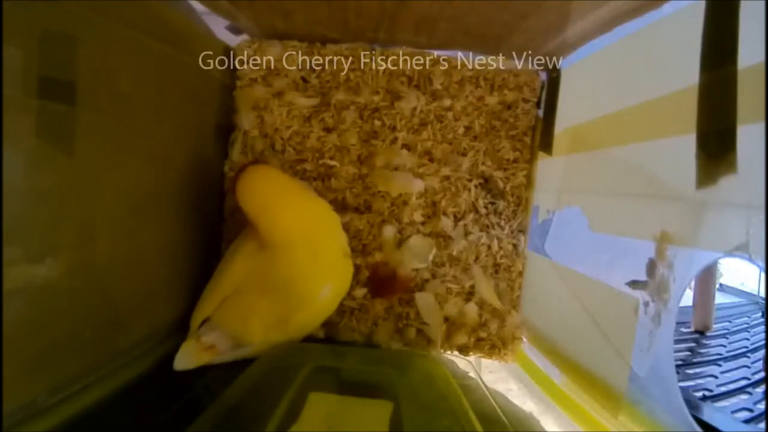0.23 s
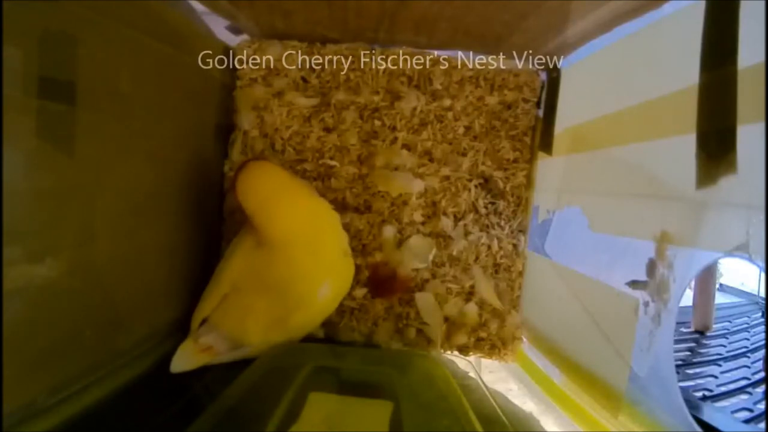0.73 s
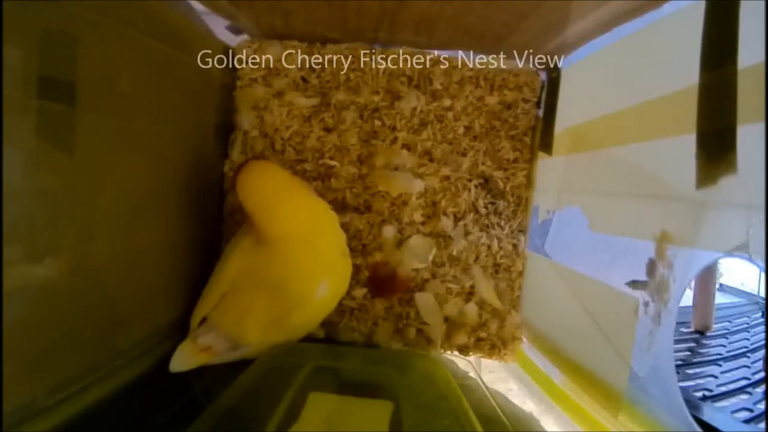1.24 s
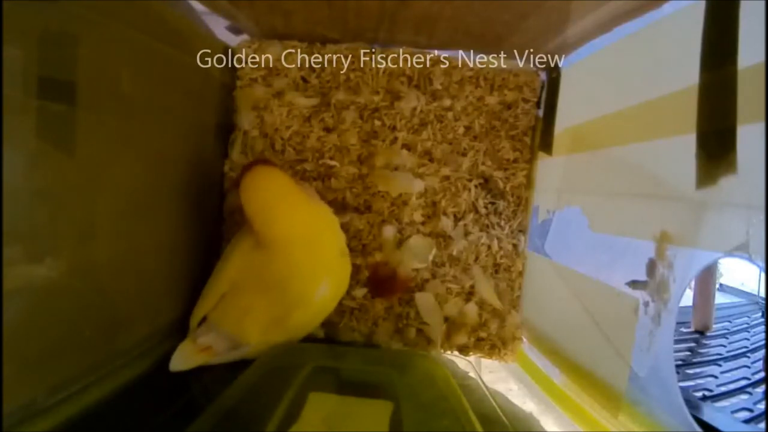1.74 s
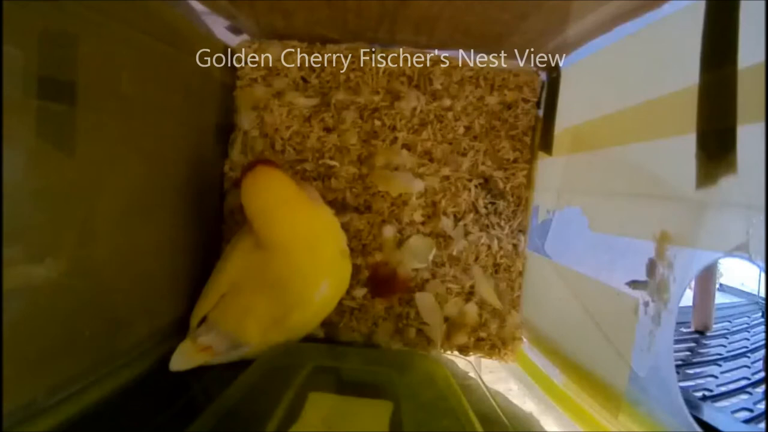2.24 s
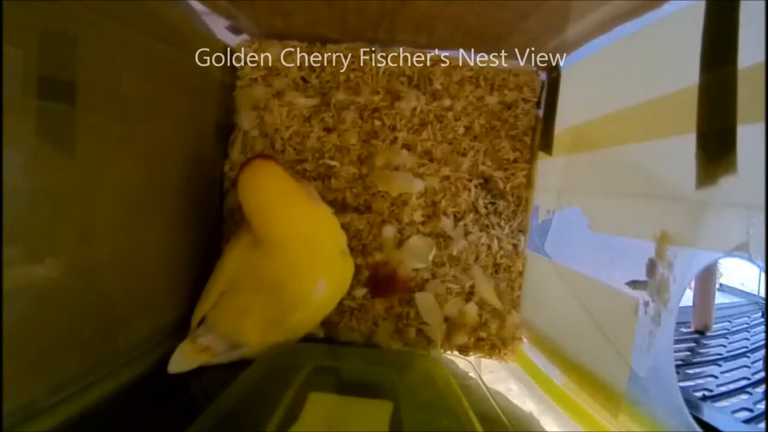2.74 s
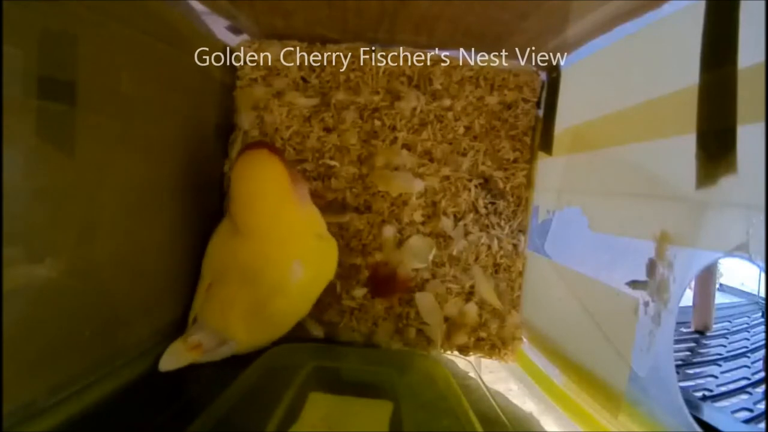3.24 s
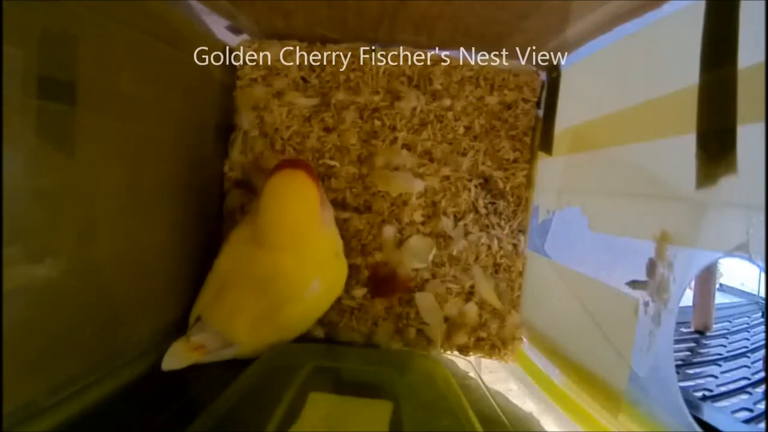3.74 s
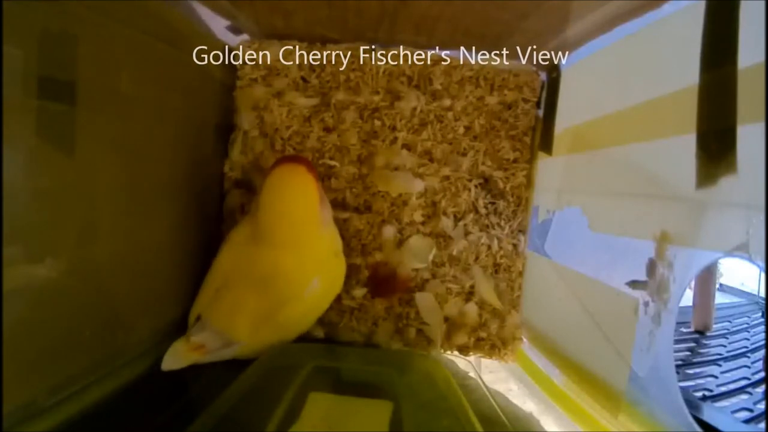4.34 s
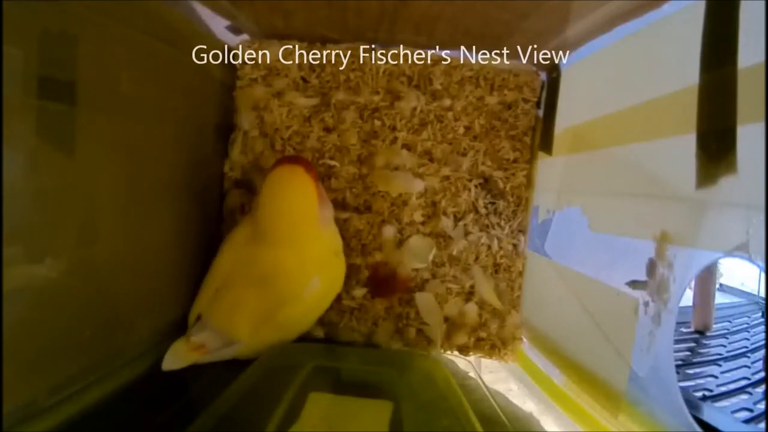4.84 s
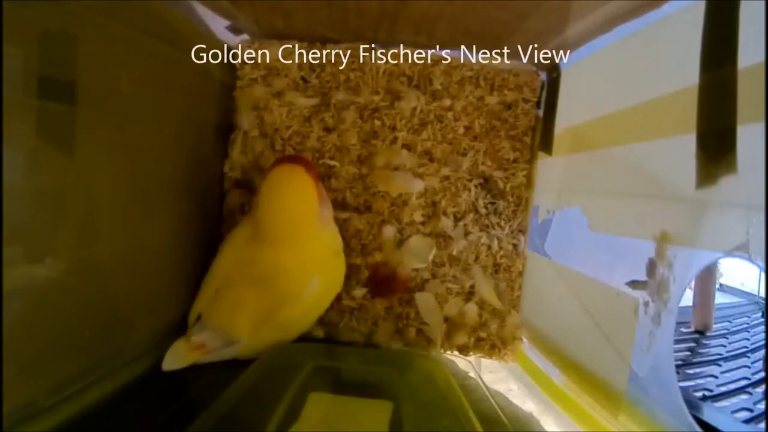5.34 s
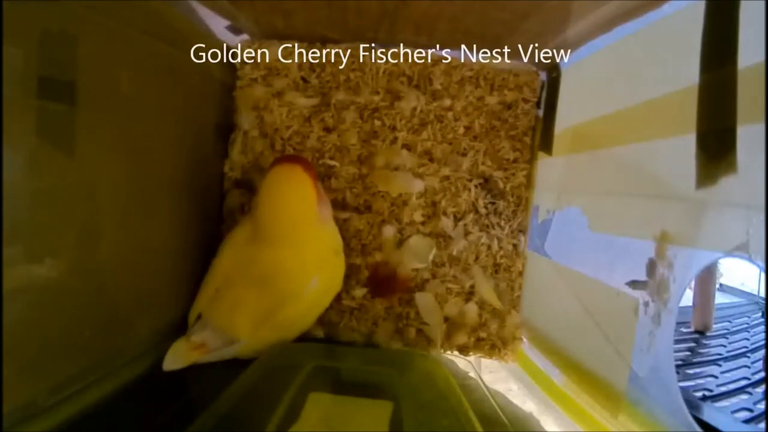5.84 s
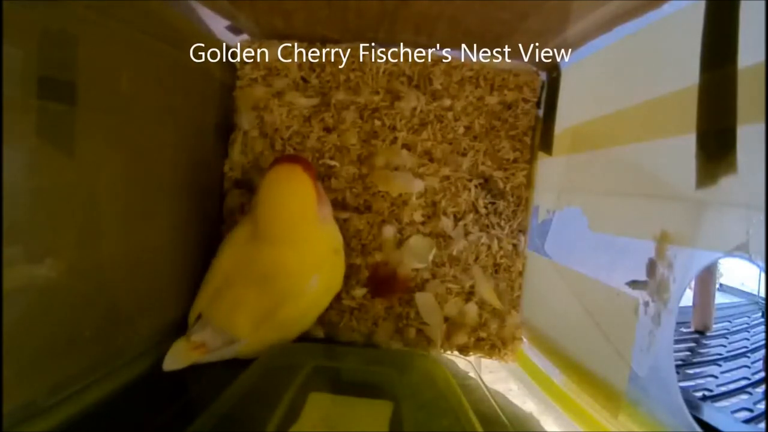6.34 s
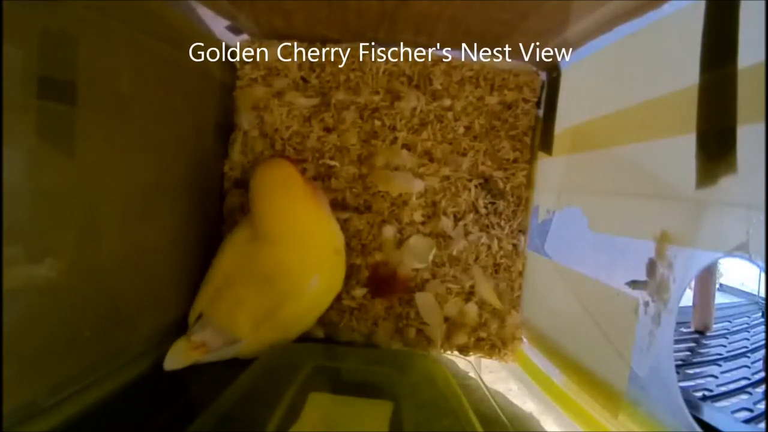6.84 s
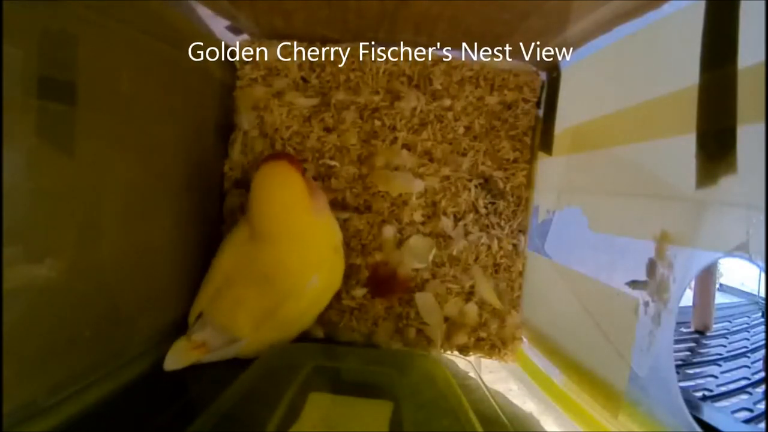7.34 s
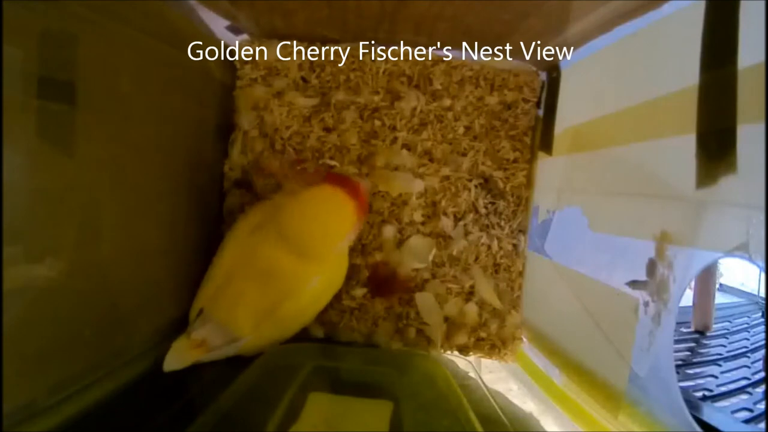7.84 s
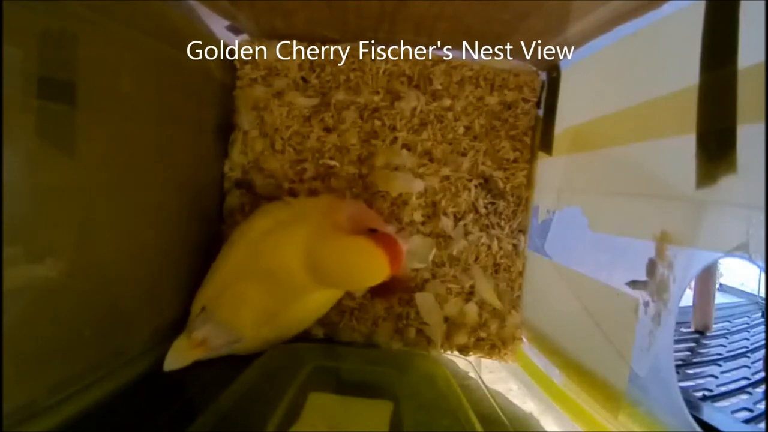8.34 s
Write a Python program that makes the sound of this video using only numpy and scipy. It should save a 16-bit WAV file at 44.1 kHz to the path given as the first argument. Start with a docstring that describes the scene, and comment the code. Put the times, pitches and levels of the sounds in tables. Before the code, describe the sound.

Inside a small wooden nest box, close to the microphone, a steady soft room hiss carries a thin high whine and tiny stirrings of bedding. Faint husky pips open, with a short raspy chirp at 0.4 s. From 0.8 to 1.7 s hollow woody knocks build, strongest around 1.2-1.5 s, mixed with brief scrapes of shavings. Three quick raspy calls follow at 1.8-2.0 s. Light taps at 2.7 s precede the loudest event, a hard clattering knock just before 3.0 s that jolts the box, with a crunchy scrape trailing off. It is then mostly quiet, with small ticks, until two tiny clipped chirps at 4.8 s. Soft taps, faint rustles and weak peeps fill 5.1-6.2 s, with a rasp at 5.5 s. Hoarse chirps come at 6.4, 6.5 and 6.7 s, then 7.5, 7.7 and 7.9 s, before faint final rustles after 8 s.

```python
"""Beak and feet knock on boards and scrape wood shavings as a small parrot shuffles in a nest box.
Knocks and scrapes are click bursts that excite box modes and decaying noise reflections.
Short raspy calls, single or in small groups, are pulses and puffs filtered by throat, beak and air.
Faint wavering pips, filtered room noise and a thin whine of near-steady sines lie behind."""
import sys
import numpy as np
from scipy import signal
from scipy.fft import rfft, irfft
from scipy.io import wavfile

SR = 44100
rng = np.random.default_rng(int(sys.argv[2]) if len(sys.argv) > 2 else 0)


def generate_wav(sig):
    """Save sig (samples, or channels by samples) to the path in sys.argv[1] as 16-bit PCM at SR."""
    pcm = np.round(np.clip(np.atleast_2d(sig).T, -1, 1) * 32767).astype(np.int16)
    wavfile.write(sys.argv[1], SR, pcm)


N = 378819


def amp(db):
    """Logarithmic level: decibels to amplitude gain."""
    return 10 ** (np.asarray(db) / 20)


def evened(x):
    """Power normalization: scales to rms 1."""
    return x / np.sqrt(np.mean(x ** 2) + 1e-20)


def unit(x):
    """Energy normalization: scales the sum of squares to 1."""
    return x / np.sqrt(np.sum(x ** 2) + 1e-20)


def add(mix, start_s, sound):
    """Superposition: adds a sound to the mix from its start time."""
    part = mix[max(round(start_s * SR), 0):][:len(sound)]
    part += sound[:len(part)]


def clock(size=16384):
    """Sampled time: the axis of one event, in seconds."""
    return np.arange(size) / SR


def coloured(x, points):
    """Spectral shaping: a gain curve drawn through points of frequency_hz and level_db."""
    hz, db = np.transpose(points)
    f = np.fft.rfftfreq(len(x), 1 / SR)
    gain_db = np.interp(np.log(f + 1), np.log(hz + 1), db)
    return irfft(rfft(x) * amp(gain_db), len(x))


def band(x, lo_hz, hi_hz, order=3):
    """Causal band-pass: a Butterworth filter with a maximally flat passband."""
    sos = signal.butter(order, [lo_hz, hi_hz], "band", fs=SR, output="sos")
    return signal.sosfilt(sos, x)


def wander(size, rate_hz):
    """Low-passed noise: smooth random motion of rms 1."""
    f = np.fft.rfftfreq(size, 1 / SR)
    spectrum = rfft(rng.standard_normal(size)) * np.exp(-(f / rate_hz) ** 2)
    return evened(irfft(spectrum, size))


def stroke(t, length, rise, fall):
    """Exponential relaxation: swells, holds for the length and dies away, all in seconds."""
    return (1 - np.exp(-t / rise)) * np.exp(-np.maximum(t - length, 0) / fall)


def grains(size, per_s, spread_db):
    """Poisson-like impulses: sparse clicks of random sign, a few much larger than the rest."""
    chance = rng.random(size)
    height = rng.exponential(1, size)
    sign = rng.choice([-1, 1], size)
    return (chance < per_s / SR) * sign * amp(spread_db * np.minimum(height, 3))


def resonate(x, hz, width_hz):
    """Moving resonance of gain 1: shifts the curve hz to zero, low-passes and shifts back."""
    turn = np.exp(2j * np.pi * np.cumsum(hz * np.ones(len(x))) / SR)
    r = np.exp(-np.pi * width_hz / SR)
    envelope = signal.lfilter([1 - r], [1, -r], x / turn + 1e-18)
    return 2 * (turn * envelope).real


def mode(drive, hz, t60):
    """Damped oscillator: one mode that rings down by 60 dB in t60 seconds."""
    r = 1000 ** (-1 / (t60 * SR))
    return signal.lfilter([1, 0, -1], [1, -2 * r * np.cos(2 * np.pi * hz / SR), r * r], drive)


def box(drive, ring_db, tail_db, t60=0.084, tail_t60=0.45):
    """Modal and diffuse response: board and air modes, wall reflections and the outer room's weak tail."""
    # modes of the box: frequency_hz, level_db (relative), t60_s
    box_modes = [(255, -8.5, 0.28), (392, -16.5, 0.14), (475, -18, 0.022), (524.8, 2, 0.13),
                 (646.5, -2.5, 0.15), (770, 1.5, 0.13), (885, -17.5, 0.091), (944, -7, 0.15),
                 (1024.5, -0.5, 0.069), (1077, 3, 0.13), (1170, -5.5, 0.13), (1252, -2, 0.053),
                 (1342, -10, 0.18), (1674, 3.5, 0.048), (1964, -8.5, 0.14), (2180, -14.5, 0.18),
                 (2710, -17.5, 0.049), (2960, -8, 0.068), (3200, -11.5, 0.23), (3397, -14, 0.041)]
    # colour of the scattered wall reflections: frequency_hz, level_db (relative)
    wall_colour = [(40, -18.5), (150, -28), (280, 2), (550, -4), (1100, -0.5), (1600, -5), (2300, -9.5),
                   (3400, -6), (4000, -28), (5000, -27), (6800, -15.5), (8000, -30.5)]
    t = clock()
    ring = sum(rng.choice([-1, 1]) * amp(db) * unit(mode(drive, hz, life)) for hz, db, life in box_modes)
    decay = amp(-60 * t / t60) + amp(tail_db - 60 * t / tail_t60)
    walls = coloured(rng.standard_normal(len(t)), wall_colour) * decay
    scattered = signal.fftconvolve(drive, walls)[:len(drive)]
    return amp(ring_db) * unit(ring) + unit(scattered)


def reflected(x, near_db=-8, far_db=-14, near_t60=0.13, far_t60=.3):
    """Diffuse reverberation: adds decaying noise reflections of the near walls and the room."""
    t = clock()
    near, far = rng.standard_normal((2, len(t))) * (t > .001)
    near_echo = amp(near_db) * unit(near * amp(-60 * t / near_t60))
    far_echo = amp(far_db) * unit(far * amp(-60 * t / far_t60))
    return x + signal.fftconvolve(x, near_echo + far_echo)[:len(x)]


def background(floor_db=-62, stir_db=-71):
    """Stationary noise and tones: room noise and hiss, tiny stirrings of the bedding, camera whine."""
    # spectrum of the room noise: frequency_hz, level_db (per Hz, relative)
    floor_colour = [(15, -59.5), (25, -30), (92, -4.5), (120, -5), (149, -4.5), (345, 1.5), (450, 0),
                    (586, 1.5), (711, 1), (783, -0.5), (972, -1), (1300, -2.5), (2610, -10.5),
                    (7350, -13.5), (7900, -16.5), (10300, -51), (17400, -120)]
    # tones of the whine: frequency_hz, level_db (rms)
    whine_tones = [(5911, -77.5), (5992, -95.5), (7881.6, -74.5)]
    hiss = evened(coloured(rng.standard_normal(N), floor_colour))
    air = amp(floor_db) * hiss * amp(1.4 * wander(N, 27))  # the noise level flickers
    stir = amp(stir_db) * evened(box(grains(N, 45, 6.4), ring_db=-4.5, tail_db=-32.5))
    t = clock(N)
    whine = 0
    for hz, db in whine_tones:
        phase = 2 * np.pi * hz * t + 0.71 * wander(N, 21)
        whine = whine + amp(db) * np.sqrt(2) * np.sin(phase)
    return air + stir + whine


def pips(waver=0.024, sag=0.041, fuzz=1.0):
    """Frequency and amplitude modulation: short husky tones that waver and sag a little."""
    # faint pips: start_s, length_s (nominal), pitch_hz (centre), level_db
    pip_events = [(0.037, 0.018, 1110, -55), (0.06, 0.028, 650, -57), (0.179, 0.017, 630, -54.5),
                  (0.568, 0.019, 644, -55), (0.798, 0.0098, 650, -52.5), (5.656, 0.019, 1950, -58.5),
                  (5.901, 0.026, 2200, -62.5), (5.917, 0.025, 1453, -61), (6.156, 0.039, 2200, -66.5),
                  (6.878, 0.03, 4270, -67), (8.06, 0.15, 4200, -75)]
    out, t = np.zeros(N), clock()
    for start_s, length, hz, db in pip_events:
        glide = sag * (.5 - np.minimum(t / length, 1))
        pitch = hz * (1 + waver * wander(len(t), 200) + glide)
        husk = 1 + fuzz * hz / 2000 * wander(len(t), 260)  # the higher the pip, the breathier
        envelope = stroke(t, length * 0.69, 0.0096, 0.0051)
        tone = np.sin(2 * np.pi * np.cumsum(pitch) / SR) * husk * envelope
        add(out, start_s, amp(db) * np.sqrt(length * SR) * unit(reflected(tone)))
    return out


def whistle(hz, waver=0.045):
    """Frequency modulation: an unsteady tone on the curve hz."""
    return np.sin(2 * np.pi * np.cumsum(hz * (1 + waver * wander(len(hz), 260))) / SR)


def cavity(x, direct_db=-17):
    """Parallel resonances: the air on the way to the microphone splits a call into narrow bands."""
    # air resonances: frequency_hz, width_hz, level_db (peak gain)
    air_modes = [(997, 115, 0.5), (1170, 46, -2), (1313.4, 24, 0), (1764, 36, 1.5), (2610, 420, -6),
                 (3066, 130, -2), (3346, 73, -5.5), (3680, 70, -7.5), (4386, 120, 0), (5320, 51, -2),
                 (6880, 140, 2.5)]
    return amp(direct_db) * x + sum(amp(db) * resonate(x, hz, width) for hz, width, db in air_modes)


def rasp(length, db, treble_db, end_hz, beak_hz, rough=0.57, clear_db=-2, squeak_db=-5):
    """Source and filter: ragged pulses and puffs of air excite gliding throat and beak resonances."""
    t = clock()
    progress = np.clip(t / length, 0, 1)
    # a bright call opens the throat wider, which raises the starting resonance
    start_hz = 1411 + 14.5 * treble_db
    # bright calls and a beak resonance above 3320 Hz bring more hiss
    hiss_db = -12 + 1.1 * treble_db + 0.0283 * (beak_hz - 3320)
    turns = np.cumsum(260 * np.exp(.35 * wander(len(t), 170))) / SR  # cycles of an uneven 260 Hz
    pulses = np.diff(np.floor(turns), prepend=0)
    puffs = (0.33 + np.exp(-(turns % 1) / .3)) * rng.standard_normal(len(t))
    drive = (1 - rough) * evened(pulses) + rough * evened(puffs)
    throat_hz = start_hz + (end_hz - start_hz) * progress ** 2.71
    # the upper resonance rises slightly, then sinks as the beak closes
    upper_hz = beak_hz * (1 + 0.035 * np.sin(np.pi * progress) - 0.065 * progress)
    # the call opens bright and hissy; the low resonance takes over towards its end
    early = stroke(t, length * 0.92, 0.0059, 0.013)
    late = stroke(t, length * 0.96, 0.01, 0.0054)
    opening = stroke(t, length * .5, 0.0072, 0.023)

    throat = unit(cavity(resonate(resonate(drive * late, throat_hz, 260), throat_hz, 480)))
    # a tone holds the throat resonance, clearest in the dull calls
    throat += amp(clear_db - .6 * treble_db) * unit(cavity(whistle(throat_hz) * late * progress))
    opening_throat = resonate(resonate(drive * opening, 1596, 74), 2030, 450)
    throat += amp(-4.0 + .5 * treble_db) * unit(cavity(opening_throat))
    throat += amp(-7) * unit(cavity(band(drive * early, 456, 980)))

    beak = unit(resonate(resonate(drive * early, upper_hz, 520), upper_hz, 750))
    beak += amp(-3.0) * unit(resonate(resonate(drive * opening, 2830, 280), 2630, 430))
    # a squeak sounds with the first half of the rasp
    squeak = whistle(upper_hz, waver=0.028) * stroke(t, length * 0.46, 0.0049, 0.0095)
    beak += amp(squeak_db) * unit(squeak)

    hiss = band(drive * (opening + 0.21 * early), 4110, 6150)
    parts = zip((throat, cavity(beak), cavity(hiss)), (0, treble_db, hiss_db))
    return np.sqrt(length * SR) * sum(amp(db + rel_db) * unit(reflected(part)) for part, rel_db in parts)


def calls(gain_db=.5):
    """Superposition of source-filter sounds: all the raspy calls."""
    # calls: start_s, length_s (nominal), level_db (throat part, before gain_db),
    # brightness_db (beak part against throat part), throat_end_hz, beak_hz (at the start)
    rasp_events = [(0.386, 0.086, -48.5, -4, 1202, 3390), (1.78, 0.061, -47, 0, 1264, 3430),
                   (1.839, 0.046, -47.5, -3.5, 1300, 3230), (1.979, 0.055, -45.5, -2.5, 1161, 3334),
                   (4.807, 0.023, -48, -9, 1300, 3200), (4.86, 0.024, -49, -12.5, 1255, 3130),
                   (5.46, 0.046, -49.5, -2, 1170, 3260), (6.383, 0.076, -51, -5, 1103, 3210),
                   (6.544, 0.064, -49, -3.5, 1012, 3210), (6.744, 0.09, -49.5, -1.5, 1100, 3435),
                   (7.503, 0.05, -50, -1, 1170, 3310), (7.657, 0.057, -46.5, -6, 1052, 3194),
                   (7.851, 0.07, -48.5, -6.5, 1248, 3600)]
    out = np.zeros(N)
    for start_s, *call in rasp_events:
        add(out, start_s, rasp(*call))
    return amp(gain_db) * out


def weighted(x, length, db, bright_db):
    """Contact stiffness shapes the spectrum: soft contacts thud, hard ones tick."""
    # bands in which a contact sounds: low_hz, high_hz, level_db (before the tilt)
    contact_bands = [(30, 248, -18.5), (229, 432, -8), (461, 814, -1.5), (823, 1386, -2),
                     (1480, 1990, -4.5), (2200, 3830, -1.5), (3774, 5240, -3.5), (5600, 7700, -5.5)]
    # a firm contact reaches the boards; below cushion_db it sinks into the bedding,
    # and thuds the more, the lighter it is
    firm_bass_db, cushion_db, thud_db_per_db, thud_max_db = -3.5, -54.5, 3.26, 8
    bass_db = firm_bass_db + np.clip(thud_db_per_db * (cushion_db - db), 0, thud_max_db)
    top_db = 1.88 * bright_db  # the top dulls faster than the treble
    tilt_db = [1.7 * bass_db, 1.8 * bass_db, bass_db, 0, 0.52 * bright_db, bright_db, top_db, top_db]
    parts = 0
    for (lo_hz, hi_hz, band_db), tilt in zip(contact_bands, tilt_db):
        parts = parts + amp(db + tilt + band_db) * unit(band(x, lo_hz, hi_hz))
    # a hard blow jolts the whole box: a deep push that grows faster than the blow itself
    jolt_db, jolt_from_db, extra_db_per_db = -41, -33, 0.5
    push_db = db + jolt_db + extra_db_per_db * max(db - jolt_from_db, 0)
    jolt = amp(push_db) * unit(band(x, 24.9, 95))
    return np.sqrt(abs(length) * SR) * (parts + jolt)


def scrapes(gain_db=0):
    """Stick-slip friction: shavings slip and snap in clumps under each stroke."""
    # strokes: start_s, length_s (nominal), level_db (before tilt), brightness_db (treble tilt)
    scrape_events = [(1.391, 0.026, -54, -2), (1.435, 0.013, -48.5, -3), (1.64, 0.028, -62.5, -11),
                     (2.303, 0.1, -67.5, -2.5), (2.919, 0.027, -55, -4), (2.991, 0.17, -45, -5.5),
                     (3.179, 0.5, -69.5, -7), (5.36, 0.18, -68.5, -10), (5.666, 0.11, -65, -13),
                     (6.0, 0.048, -71.5, 1), (8.04, 0.025, -70.5, 3.5), (8.43, 0.099, -70, -7)]
    sag_db_per_s, release_s, release_share = 29, 0.006, 0.09
    out, t = np.zeros(N), clock(size=24576)
    for start_s, length, *levels in scrape_events:
        clumps = amp(2 * wander(len(t), 70))
        fall_s = release_s + release_share * length  # a long stroke lets go more slowly
        # each stroke loses force as it goes on
        force = stroke(t, length * 0.88, 0.0016, fall_s) * amp(-sag_db_per_s * t)
        drive = grains(len(t), 1100, 5.8) * force * clumps
        add(out, start_s, weighted(box(drive, ring_db=-7, tail_db=-22.5), length, *levels))
    return amp(gain_db) * out


def knocks(gain_db=2, chatter_db=-1):
    """Impact excitation: a sharp first touch and a brief chatter of beak or claw set the box ringing."""
    # blows: start_s, contact_length_s (nominal), level_db (before tilt and gain_db),
    # brightness_db (treble tilt)
    blow_events = [(0.831, 0.012, -56.5, -16), (0.853, 0.011, -56, -19), (0.992, 0.018, -44.5, -11.5),
                   (1.177, 0.015, -37.5, -14), (1.348, 0.028, -32.5, -12.5), (1.478, 0.011, -38.5, -13),
                   (1.503, 0.018, -44.5, -11.5), (1.548, 0.0082, -49.5, -17), (1.719, 0.02, -44.5, -18),
                   (2.647, 0.019, -42.5, -6.5), (2.7, 0.005, -46.5, -10), (2.9563, 0.007, -25.5, -21),
                   (2.962, 0.007, -20.5, -9), (2.9712, 0.0054, -22.5, -6), (3.269, 0.019, -57, -8),
                   (3.666, 0.021, -51.5, -3.5), (3.95, 0.0075, -53, -10), (5.137, 0.011, -48.5, -18),
                   (5.223, 0.017, -56.5, -4.5), (5.33, 0.013, -56, -7), (5.816, 0.019, -50.5, -3),
                   (5.972, 0.01, -50, -3), (8.023, 0.014, -62.5, -1.5)]
    out, t = np.zeros(N), clock()
    for start_s, length, *levels in blow_events:
        chatter = unit(grains(len(t), 900, 3.5) * stroke(t, length * 0.68, 0.0019, 0.0023))
        first_touch = 0.62 * (t == 0)
        drive = amp(chatter_db) * chatter + first_touch
        add(out, start_s, weighted(box(drive, ring_db=0.5, tail_db=-19.0), length, *levels))
    return amp(gain_db) * out


def scene():
    """Linear superposition: all sources add at one microphone."""
    return (background() + pips() + calls() + scrapes() + knocks())[None]


def record(dry):
    """Band limitation: a linear-phase low-pass gives the narrow band of a small camera."""
    edge_hz = 8130
    lowpass = signal.firwin(801, edge_hz, window=("kaiser", 8), fs=SR)
    return signal.oaconvolve(dry, lowpass[None], "same")


dry = scene()
out = record(dry)
generate_wav(out)
```